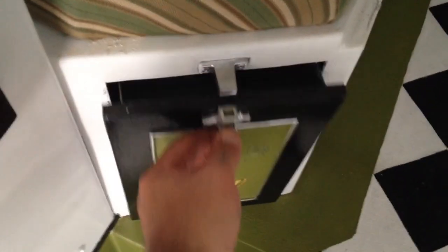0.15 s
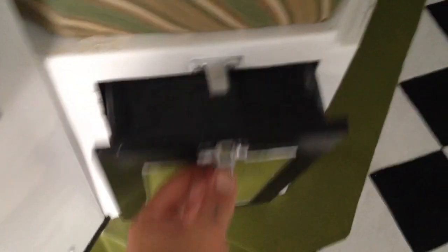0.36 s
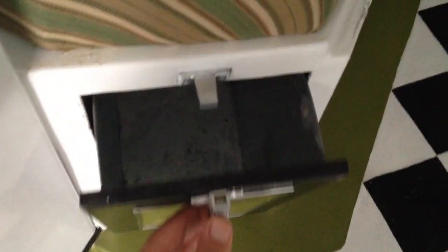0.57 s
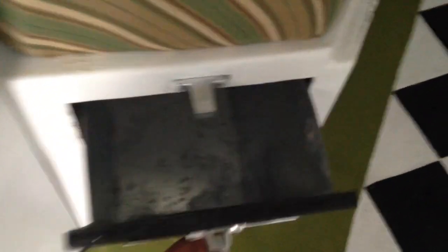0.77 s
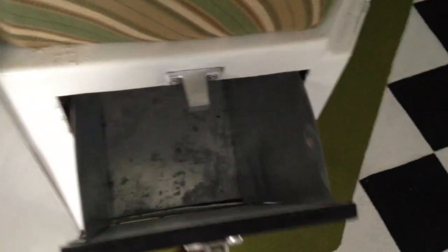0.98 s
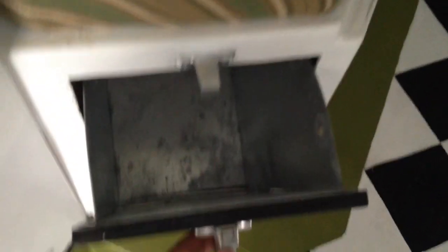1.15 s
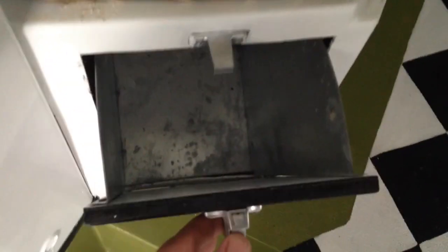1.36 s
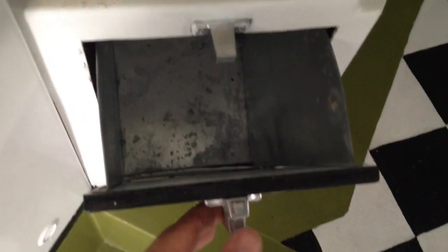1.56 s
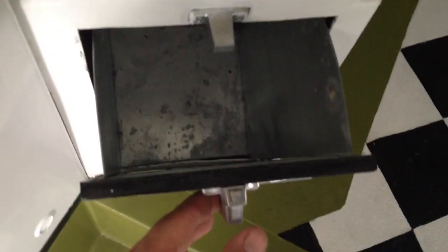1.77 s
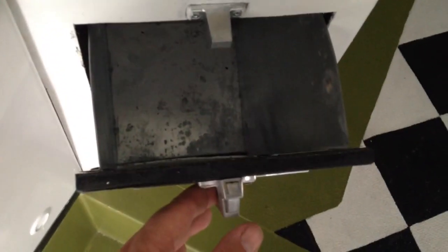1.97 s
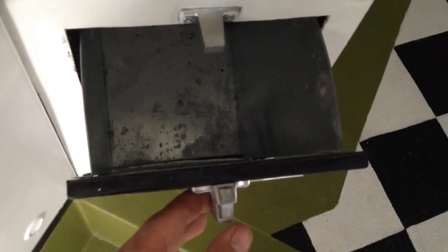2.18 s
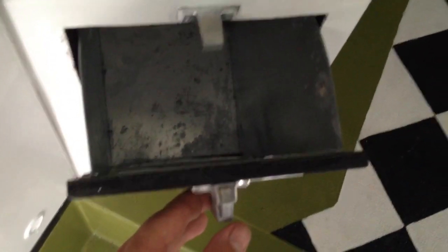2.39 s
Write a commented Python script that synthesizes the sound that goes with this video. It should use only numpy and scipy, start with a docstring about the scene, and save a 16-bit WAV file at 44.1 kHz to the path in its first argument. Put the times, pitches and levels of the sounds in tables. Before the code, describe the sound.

A small metal latch snaps open and a bin door knocks and rumbles as it tilts out

```python
"""Inside a small trailer a hand unclips a metal latch and tilts a wooden bin door open.
The latch snaps and ticks as decaying resonances; the hard walls answer each click with a short dense tail.
The door knocks and rumbles as noise forces drive its modes, while the hinge scrapes and rubs.
Crickets chirp faintly outside as pulsed narrow noise, over the steady shaped noise of the quiet cabin."""
import sys
import numpy as np
from scipy import signal
from scipy.fft import rfft, irfft
from scipy.io import wavfile

SR = 44100
rng = np.random.default_rng(int(sys.argv[2]) if len(sys.argv) > 2 else 0)


def file_out(sig):
    """Save sig as 16-bit WAV at sys.argv[1]."""
    # one column per channel
    cols = np.atleast_2d(sig).T
    # limit, then scale
    lim = np.clip(cols, -1, 1)
    pcm = np.round(lim * 32767).astype(np.int16)
    wavfile.write(sys.argv[1], SR, pcm)


N = 107118


def amp(db):
    """Level law: 20 dB is a factor of ten in amplitude."""
    return 10 ** (np.asarray(db, float) / 20)


def unit(x):
    """Normalization to an RMS of one."""
    return x / np.sqrt(np.mean(x ** 2))


def band(x, hz, octaves):
    """Zero-phase filtering: a bell on a log-frequency axis, down to 1/e at the given octaves off centre."""
    f = np.maximum(np.fft.rfftfreq(x.shape[-1], 1 / SR), 1)
    bell = np.exp(-(np.log2(f / hz) / octaves) ** 2)
    return irfft(rfft(x) * bell, x.shape[-1])


def grains(shape, scatter_db):
    """Impulsive noise: Gaussian samples whose sizes are spread further by a capped exponential draw."""
    boost_db = scatter_db * np.minimum(rng.exponential(size=shape), 3)
    return unit(rng.standard_normal(shape) * amp(boost_db))


def fade(t, t60):
    """Exponential decay: 60 dB in t60 seconds."""
    return np.exp(-np.log(1000) * t / t60)


def ring(modes, t):
    """Modal superposition: an impulse response as a sum of decaying sines."""
    return sum(amp(db) * fade(t, t60) * np.sin(2 * np.pi * hz * t) for hz, db, t60 in modes)


def add(out, x, s):
    """Linear superposition: mix x into out from time s, trimmed at both ends."""
    i = int(round(s * SR))
    x = x[max(-i, 0):N - i]
    out[max(i, 0):max(i, 0) + len(x)] += x


# Resonances of the metal latch: f/Hz, relative level/dB, t60/s
LATCH_MODES = [(766, 2, 0.042), (1230, -9, 0.14), (1595, -4.5, 0.13), (2050, -8, 0.04), (2465, -7, .25),
               (2850, -6, .25), (3320, -5.5, .13), (3770, -3, 0.15), (4274, -13.5, .1), (5165, -4, 0.12),
               (6280, -5.5, 0.087), (6600, -9.5, 0.14), (9440, -6, .08), (12160, -0.5, .08)]
LATCH_WIDTH_OCTAVES = .085


def latch_ring(echoes, levels, latch_db, t):
    """Resonance roughened by wall echoes: decaying narrow noise bands, tinted by the click's own spectrum."""
    out = 0
    for hz, db, t60 in LATCH_MODES:
        colour_db = np.interp(np.log(hz), np.log(CLICK_BANDS), levels) - max(levels)
        # the reversed grains keep the ring's noise distinct from the wall tail's
        rough_tone = unit(band(echoes[::-1], hz, LATCH_WIDTH_OCTAVES))
        out = out + amp(latch_db + colour_db + db) * rough_tone * fade(t, t60)
    return out


# Cabin tail, one entry per click band: early t60/s
EARLY_TAIL = [0.15, 0.089, .09, 0.073, 0.037]
# Cabin tail, one entry per click band: late t60/s
LATE_TAIL = [.4, 0.19, 0.27, 0.22, 0.19]
# Cabin tail, one entry per click band: late level relative to early/dB
LATE_LEVEL = [-10.5, -9, -14.5, -14.5, -8]
CRACK_T60_S, CRACK_DB = .009, 2  # crack level relative to the start of the tail


def wall_tail(echoes, levels, t):
    """Double-slope reverberation: each band decays first fast, then slowly, under a brief crack."""
    out = 0
    for hz, db, early, late, late_db in zip(CLICK_BANDS, levels, EARLY_TAIL, LATE_TAIL, LATE_LEVEL):
        tail = (fade(t, early) + amp(late_db) * fade(t, late)) / (1 + amp(late_db))
        crack = amp(CRACK_DB) * fade(t, CRACK_T60_S)
        out = out + amp(db) * unit(band(echoes, hz, 0.66)) * (tail + crack)
    return out


# Modes of door and bin: f/Hz, relative level/dB, t60/s
DOOR_MODES = [(68, -13.5, 0.086), (106.4, -3, .08), (164.8, -7, 0.1), (219, -7, 0.2), (243, 2.5, 0.12),
              (315.3, 0, .12), (374.5, -4, .1), (436, 1, 0.072), (549.7, -7, 0.053), (718, -10, 0.065),
              (782.6, -10.5, .06), (1088, -17, 0.023), (1265.5, -15.5, 0.041), (1640, -19, 0.088),
              (2056, -22.5, 0.07)]


def body(modes, t):
    """Modal impulse response: high-passed to drop the slow push, then scaled to unit energy."""
    high_pass = signal.butter(3, 60, "high", fs=SR, output="sos")
    x = signal.sosfilt(high_pass, ring(modes, t))
    return x / np.sqrt(np.sum(x ** 2))


# Centres of the click bands: f/Hz
CLICK_BANDS = [1000, 2200, 4200, 7700, 13200]
# Latch and hinge clicks: t/s, tail level/dB in each of the five click bands before the crack is added,
# latch ring drive/dB, door knock drive/dB
CLICK_EVENTS = [(-.015, -32, -69, -54, -39, -46.5, -78, -32.5),
                (0.119, -61, -70, -66.5, -69, -69, -78.5, -66.5),
                (0.1753, -56, -60, -55.5, -66, -57.5, -71, -67.5),
                (0.1981, -57, -58.5, -46.5, -76, -40, -55.5, -45.5),
                (0.2371, -33.5, -29.5, -23, -29, -31, -25.5, -33),
                (0.4046, -61, -67, -59, -62, -81, -78, -68),
                (0.4692, -62, -76, -59.5, -62, -78, -70, -31.5),
                (0.595, -39.5, -38.5, -56.5, -46.5, -63, -75, -20.5),
                (.789, -71, -78, -61, -63, -87, -62, -51),
                (0.851, -63.5, -85, -50.5, -40.5, -47.5, -76, -39),
                (0.902, -63, -78, -87, -62.5, -54, -85, -46),
                (1.0105, -78, -76.5, -58, -70, -53.5, -56, -67),
                (1.066, -82, -71.5, -70.5, -85, -70, -59, -58),
                (1.116, -82, -73.5, -59, -76, -64, -76, -41),
                (1.128, -59.5, -58.5, -61, -54, -56, -65, -35),
                (1.1334, -55.5, -52.5, -47, -34.5, -32.5, -42, -56),
                (1.3218, -71, -80, -72, -76, -69, -84, -71),
                (1.44, -96, -80, -66, -100, -60.5, -68.5, -62.5),
                (1.501, -51.5, -44, -39, -38.5, -34, -33, -52.5),
                (1.599, -63, -76, -78, -88, -84, -90, -60), (1.618, -62.5, -75.5, -74, -73, -67, -77, -58),
                (1.770, -50.5, -47, -44.5, -32.5, -32, -30, -57),
                (1.886, -68.5, -69.5, -76, -63, -62, -60, -72),
                (1.9243, -61.5, -61, -55, -71, -55.5, -67, -41),
                (2.39, -81, -81, -82, -70.5, -68.5, -91, -57)]
ECHO_SCATTER_DB, RISE_S, KNOCK_T60_S = 2.5, .0002, 0.033  # RISE_S is a time constant


def clicks():
    """Impulsive excitation: each click scatters off the walls, rings the latch and pushes the door."""
    out, t = np.zeros(N), np.arange(16384) / SR
    rise = 1 - np.exp(-t / RISE_S)
    door = body(DOOR_MODES, t)
    for s, *levels, latch_db, knock_db in CLICK_EVENTS:
        echoes = grains(len(t), ECHO_SCATTER_DB)
        snap = latch_ring(echoes, levels, latch_db, t) + wall_tail(echoes, levels, t)
        push = rng.standard_normal(len(t)) * fade(t, KNOCK_T60_S)
        knock = signal.fftconvolve(door, push)[:len(t)]
        add(out, snap * rise + amp(knock_db) * knock, s)
    return out


# Hinge drag: t/s, force level/dB on each of four groups of door modes from deep to middle,
# scrape level/dB (also the force on the fifth, highest group; the scrape is then lowered by SCRAPE_HISS_DB),
# fine treble rub level/dB
DRAG_LEVELS = [(0.0, -54, -58, -36, -34, -45, -86), (0.07, -61, -70, -53.5, -51, -70.5, -83),
               (0.14, -46.5, -65, -47.5, -66, -56.5, -67), (0.18, -62, -68, -49.5, -66.5, -74, -62.5),
               (0.25, -50.5, -52, -39.5, -39, -36.5, -39), (0.32, -53, -55.5, -46, -50.5, -47, -61),
               (0.45, -65, -55.5, -65, -57, -61, -55), (0.47, -48, -56, -56, -48, -52, -62),
               (0.51, -32, -47, -39, -38, -47, -57), (0.56, -77, -48, -37, -55.5, -65, -61),
               (0.61, -36, -45, -30, -32, -43.5, -57.5), (0.68, -35, -39, -44.5, -44.5, -71, -65),
               (0.74, -56, -55, -46.5, -54, -62.5, -65.5), (0.78, -71, -40.5, -56, -55, -64.5, -66),
               (0.85, -46, -46.5, -46.5, -50, -61, -59.5), (0.93, -52.5, -43, -47.5, -53.5, -89, -68),
               (0.99, -56, -52, -64, -61.5, -69, -66.5), (1.03, -58, -54.5, -54, -57, -71, -64.5),
               (1.07, -54, -62, -62, -51, -68, -64), (1.11, -47, -49.5, -52.5, -49.5, -63.5, -57),
               (1.2, -45.5, -54, -53, -50.5, -68.5, -65), (1.3, -64, -58, -64, -65, -73.5, -71.5),
               (1.39, -58, -71, -70.5, -65, -68, -69.5), (1.45, -66.5, -67, -72, -63, -72.5, -70.5),
               (1.81, -67.5, -76.5, -76, -69.5, -70, -69), (1.97, -55, -69, -66.5, -60, -69.5, -74),
               (2.06, -65, -70.5, -74, -74, -74.5, -84.5), (2.43, -69.5, -77, -81, -72.5, -76, -73)]
# Groups of door modes driven together: first index, index after the last
DRIVEN_GROUPS = [(0, 2), (2, 3), (3, 5), (5, 9), (9, 15)]
DRAG_GRAIN_DB, SCRAPE_HISS_DB = 3.0, -3
SCRAPE_HZ, RUB_HZ = 1110, 7000


def drag():
    """Friction excitation: uneven forces shake the door's modes, scrape, and rub finely in the treble."""
    t, columns = np.arange(N) / SR, np.array(DRAG_LEVELS).T
    *forces, rub = (amp(np.interp(t, columns[0], c)) for c in columns[1:])
    shake = 0
    for force, (a, b) in zip(forces, DRIVEN_GROUPS):
        response = body(DOOR_MODES[a:b], t[:SR // 2])
        shake = shake + signal.fftconvolve(force * grains(N, DRAG_GRAIN_DB), response)[:N]
    scrape = forces[-1] * amp(SCRAPE_HISS_DB) * unit(band(grains(N, 2.5), SCRAPE_HZ, 1.4))
    fine_rub = rub * unit(band(grains(N, 1.5), RUB_HZ, 3.9))
    return shake + scrape + fine_rub


# Spectrum of the quiet cabin: f/Hz, relative spectral level/dB
AIR_SPECTRUM = [(15, -33.5), (25, -2.5), (107, 2), (457, -9.5), (598, -14), (1270, -17), (2700, -29.5),
                (5010, -16), (5580, -24), (15500, -30.5)]
AIR_DB = -69.5  # RMS level before the final low-pass


def air():
    """Stationary noise: a steady hush with a fixed spectrum, interpolated over log frequency."""
    f, (hz, db) = np.maximum(np.fft.rfftfreq(N, 1 / SR), 1), np.array(AIR_SPECTRUM).T
    shape = amp(np.interp(np.log(f), np.log(hz), db))
    return amp(AIR_DB) * unit(irfft(rfft(rng.standard_normal(N)) * shape, N))


# Crickets: f/Hz, first chirp t/s, chirp period/s, pulses per chirp (count), pulse spacing/s, pulse length/s
CRICKET_SONGS = [(4480, .24, .448, 7, .022, .016), (5110, .058, .44, 3, .043, .028),
                 (5520, .297, .345, 3, .043, .032), (4760, .435, .612, 6, .021, .017),
                 (5150, .24, .449, 3, .043, .015)]
# Central pulse level of each cricket before scatter and echoes: level/dB
CRICKET_LEVELS = [-76, -71.5, -81.5, -71.5, -77]
CRICKET_WIDTH_OCTAVES, CRICKET_ECHO_S = .03, 0.019  # the echo time is a time constant


def crickets():
    """Amplitude modulation: chirps of short pulses gate a rough narrow tone, blurred by echoes on the way in."""
    out = 0
    blur = np.exp(-np.arange(SR // 20) / SR / CRICKET_ECHO_S)
    for (hz, first, period, count, spacing, length), db in zip(CRICKET_SONGS, CRICKET_LEVELS):
        gate, pulse = np.zeros(N), np.hanning(int(length * SR))
        for n, chance in enumerate(rng.standard_normal((8, 8))):
            for k, b in enumerate(chance[:count]):
                start = min(first + n * period + k * spacing, N / SR)
                add(gate, amp(db + 1.5 * b) * pulse, start)  # pulse levels scatter by 1.5 dB
        gate = gate + signal.fftconvolve(gate, blur / blur.sum())[:N]
        out = out + gate * unit(band(rng.standard_normal(N), hz, CRICKET_WIDTH_OCTAVES))
    return out


def scene():
    """Linear superposition of all sources in one channel."""
    return (clicks() + drag() + air() + crickets())[None]


DROP_HZ, TOP_HZ = 15300, 16494


def record(dry):
    """Low-pass filtering: the band ends with a drop at 15.3 kHz and a steep cut at 16.5 kHz."""
    drop = signal.ellip(6, .3, 28, DROP_HZ, fs=SR, output="sos")
    steep_cut = signal.ellip(8, .2, 70, TOP_HZ, fs=SR, output="sos")
    return signal.sosfilt(steep_cut, signal.sosfilt(drop, dry))


dry = scene()
out = record(dry)
file_out(out)
```